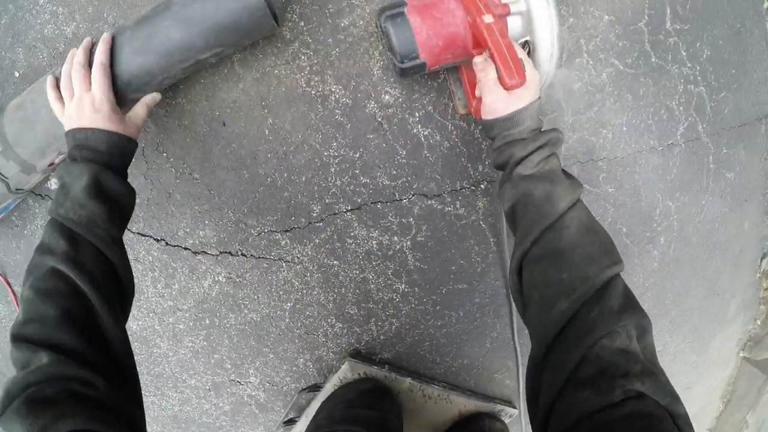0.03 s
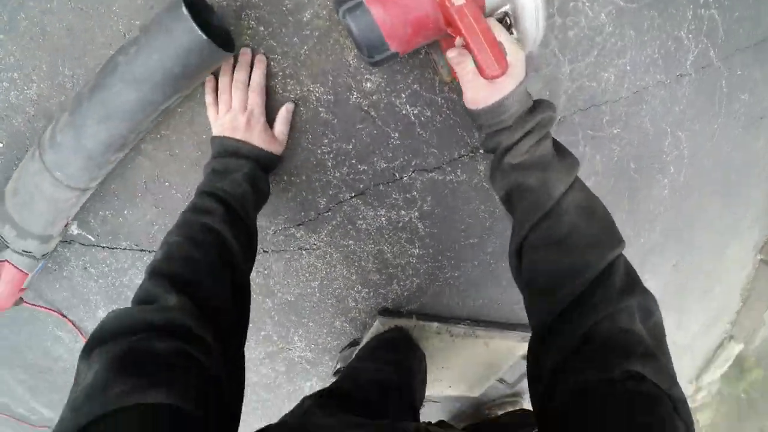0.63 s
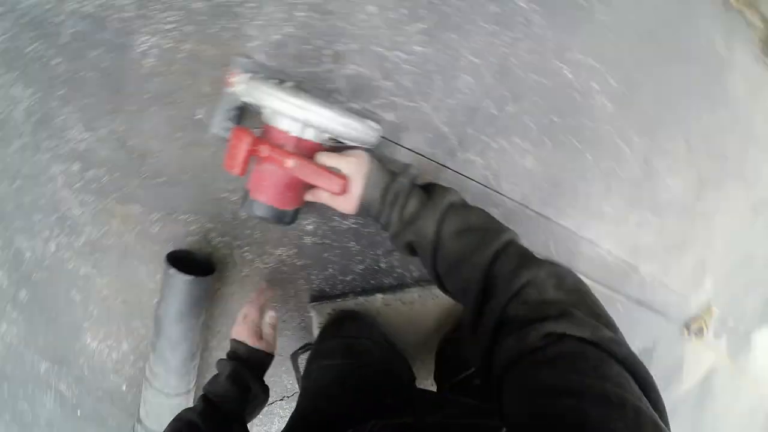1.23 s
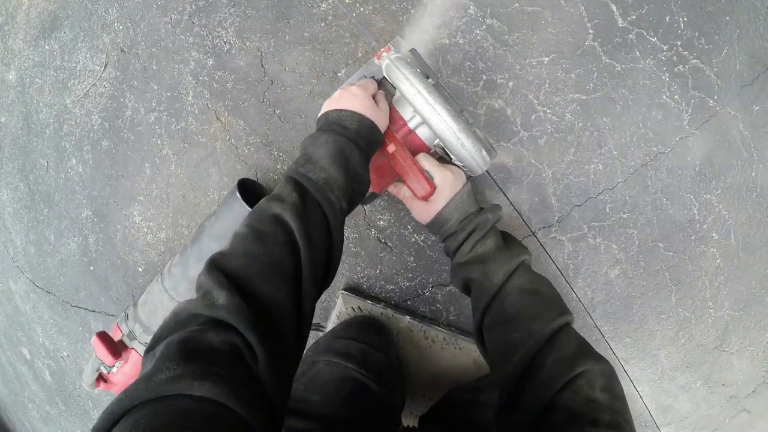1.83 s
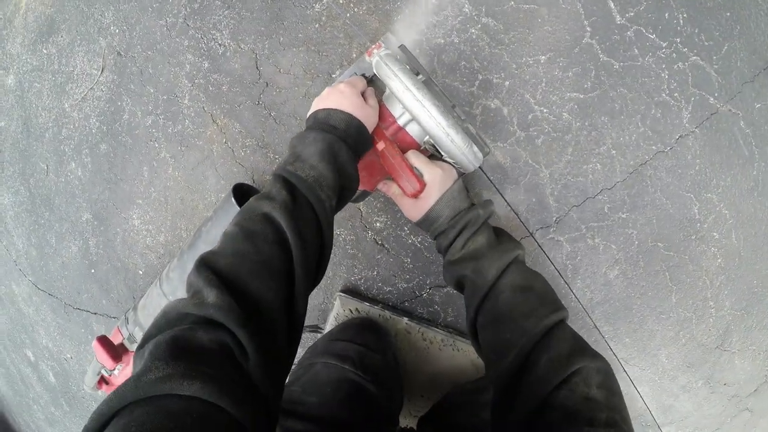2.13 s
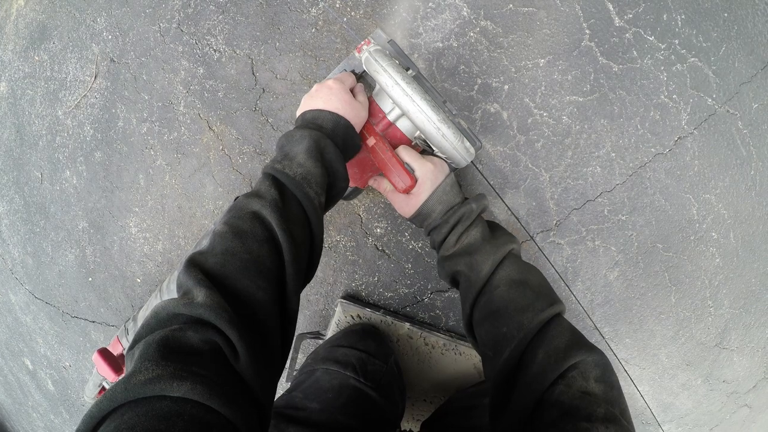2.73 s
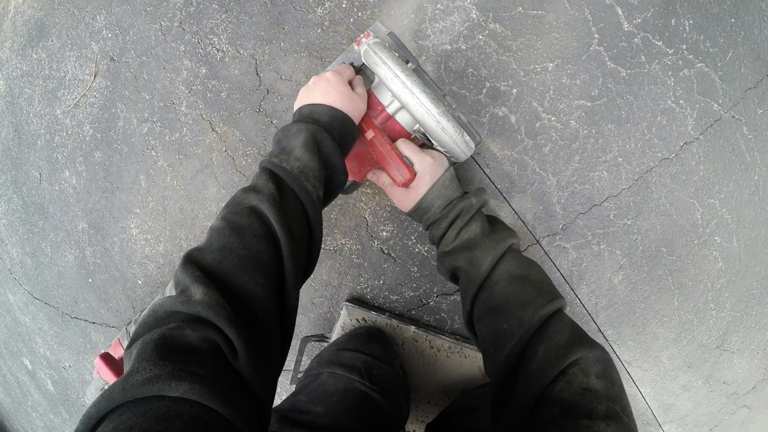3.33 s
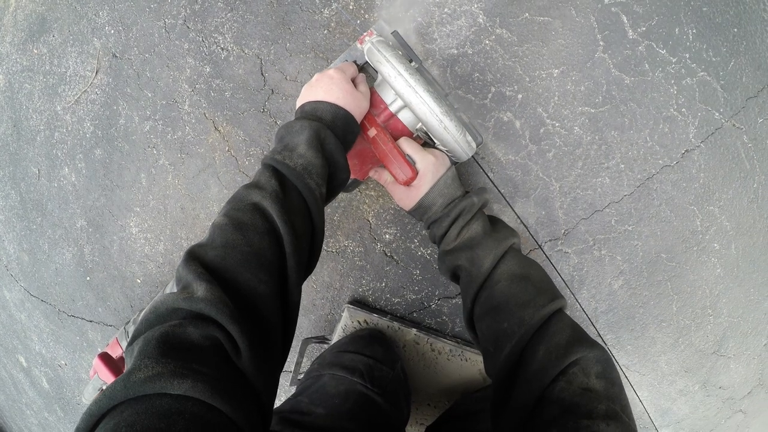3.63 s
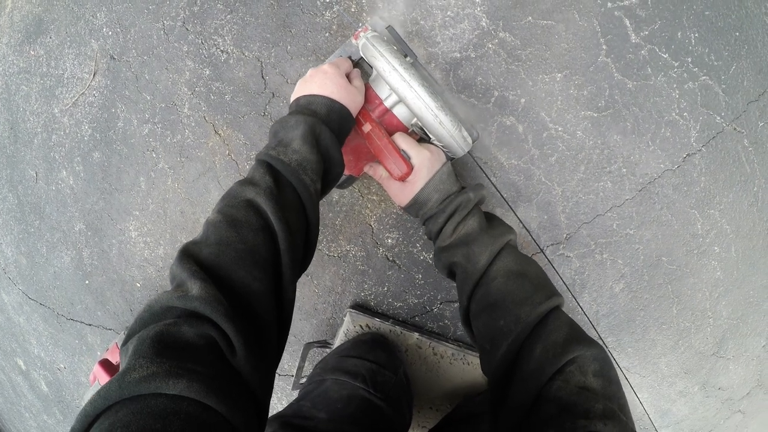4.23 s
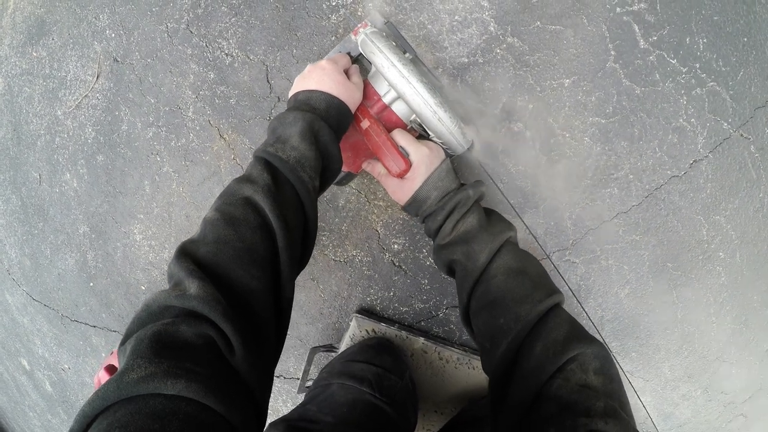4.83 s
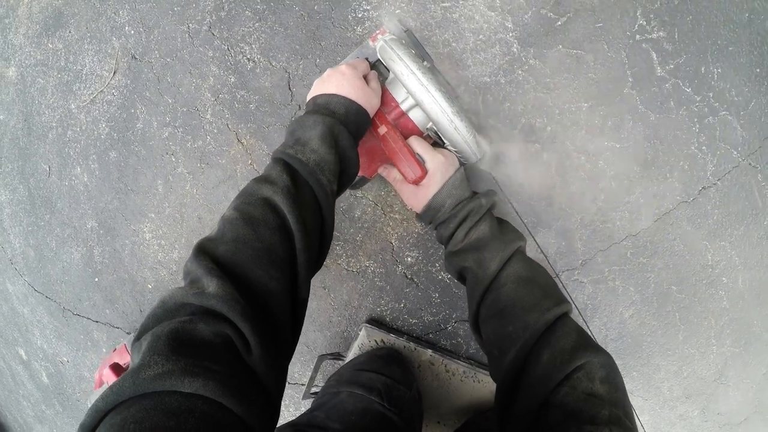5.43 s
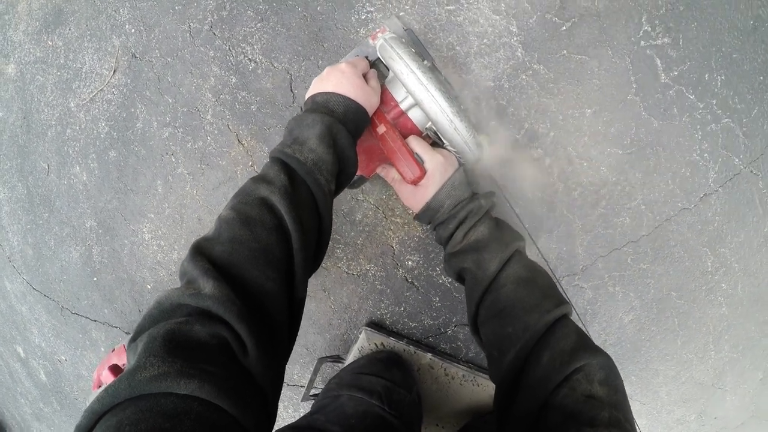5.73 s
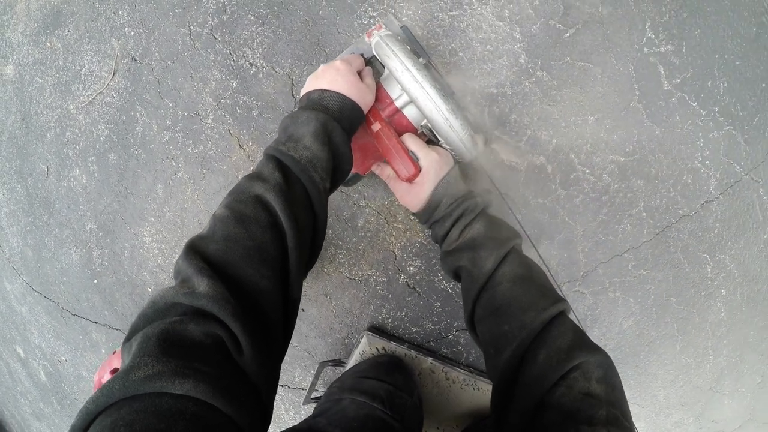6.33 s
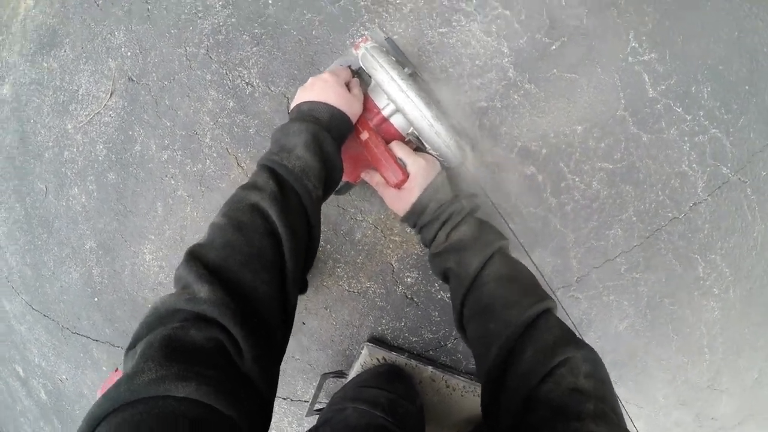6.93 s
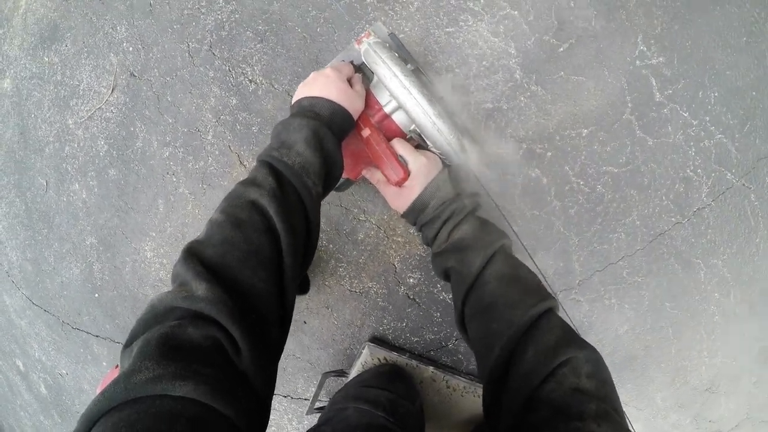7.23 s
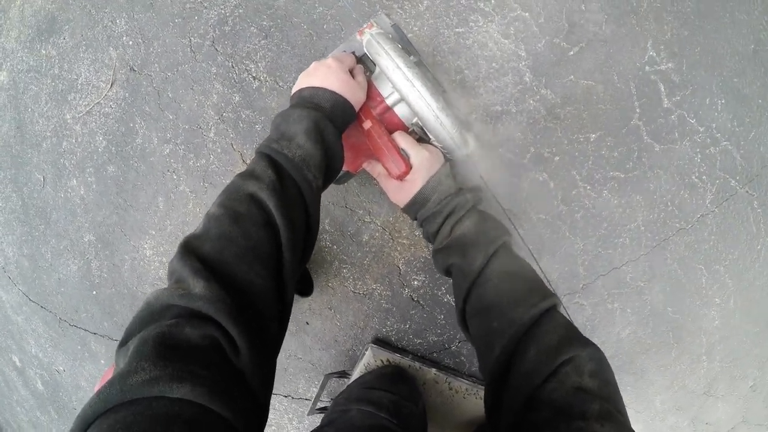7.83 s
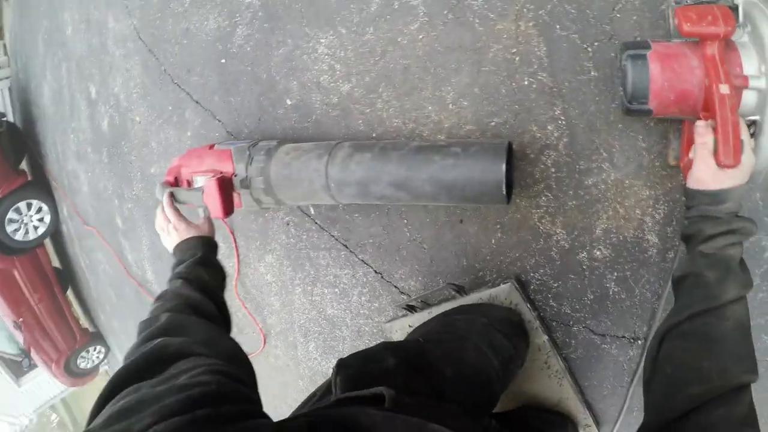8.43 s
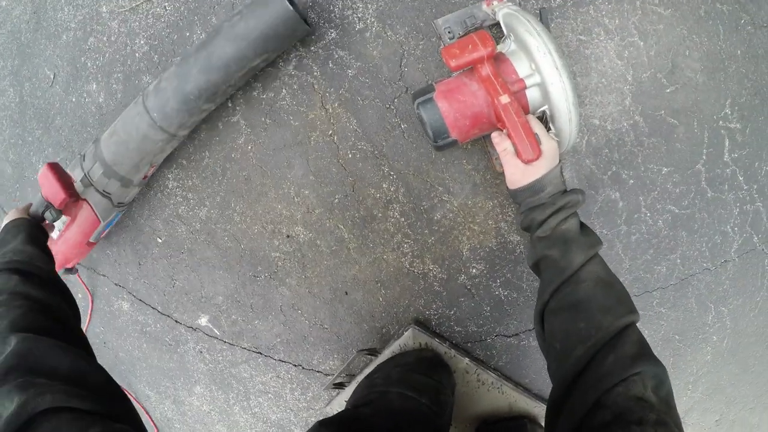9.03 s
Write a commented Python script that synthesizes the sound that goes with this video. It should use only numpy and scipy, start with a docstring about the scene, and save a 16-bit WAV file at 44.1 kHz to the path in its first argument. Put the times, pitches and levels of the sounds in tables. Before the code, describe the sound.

A circular saw grinds through asphalt with a harsh, hissing whine while a leaf blower roars and drones beside it outdoors.

```python
"""A circular saw nicks an asphalt driveway and lifts clear, while an electric leaf blower roars beside it.
At 1.6 s the blade is set down and bogs to about half speed: grit rings the steel, the loaded gears whine.
Near 5.4 s a gust buffets the body-worn microphones, and their stereo pair fades to one sheltered mic
as the level dips briefly. At 8 s the blade is pulled out of the slot and spins up again."""
import sys
import numpy as np
from scipy import signal
from scipy.fft import rfft, irfft, next_fast_len
from scipy.io import wavfile
from scipy.ndimage import uniform_filter1d

SR = 44100
rng = np.random.default_rng(int(sys.argv[2]) if len(sys.argv) > 2 else 0)


def write(x):
    x = np.atleast_2d(x).T
    wavfile.write(sys.argv[1], SR, np.round(np.clip(x, -1, 1) * 32767).astype(np.int16))


N = 399987
TIME = np.arange(N) / SR
BINS = np.fft.rfftfreq(N, 1 / SR)

# Pushes on the saw, each held until the next.
# Each row: start in seconds, load as the share of free speed it takes away (0 is lifted).
PUSHES = [(0, .19), (.2, .65), (.35, 0), (1.63, .8), (1.88, .49), (2.15, .65), (2.42, .51), (2.9, .445),
          (5.7, .47), (6.3, .34), (6.9, .45), (7.4, .393), (7.98, 0)]
# Colour of the grinding. Each row: frequency in Hz, relative level in dB.
GRIND_COLOUR = [(200, -74.5), (700, -60.5), (1500, -68.5), (2100, -66), (3400, -68), (5000, -60.5),
                (7000, -64.5), (10000, -67.3), (12000, -59.5), (14000, -55), (15700, -57.3)]
# Ring of the steel blade. Each row: frequency in Hz, width in Hz, boost in dB.
BLADE_MODES = [(2570, 390, 6.5), (2880, 110, 5), (3370, 120, 7), (4030, 200, 3.5), (5000, 350, 3),
               (5760, 180, -2), (7400, 167.0, 3), (7924, 373.0, 10), (8720, 280, 4), (9540, 232.0, 4.8),
               (10660, 210.0, 7), (11170, 210, 6.5), (12381.0, 197.0, 2.5), (13900, 217.0, 5.5),
               (14614.0, 204.0, 3), (15239.0, 221.0, 3)]
# Colour of the saw's air. Each row: frequency in Hz, relative level in dB.
RUSH_COLOUR = [(500.0, -76), (1500.0, -62), (2500.0, -67), (4500.0, -63.5), (6500.0, -62.5), (8500.0, -63),
               (10500.0, -66), (12500.0, -63.5), (14000.0, -63), (15500.0, -56.1)]
# Ring of the guard and housing. Each row: frequency in Hz, width in Hz, boost in dB.
GUARD_MODES = [(1500.0, 176.0, 1), (2724, 380, 7.5), (3340, 410, 5.5), (3870, 320, 4), (6361.0, 415.0, 0.5),
               (7000, 462.0, 1), (8749.0, 544.0, -1), (9300, 493.0, 4.5), (9701.0, 577.0, -0.3),
               (12600, 979.0, 6.5), (15104.0, 724.0, 2)]
# Blade or guard sings out. Each row: start and end in seconds, pitch and width in Hz, top level in dB.
SQUEALS = [(-.25, .35, 12520, 400, -25.5), (.25, .85, 14950, 250, -29), (1.052, 1.85, 7800, 603, -32),
           (2.3, 3.6, 13750, 400, -30), (-.2, .75, 6550, 500, -34), (2.65, 3.55, 5100, 130, -37),
           (3.45, 4.05, 5820, 350, -31), (4.449, 5.15, 11180, 90, -34), (4.3, 5.6, 14800, 199.8, -32),
           (5.799, 6.6, 4000, 230, -29.5), (6.65, 8.1, 7860, 120, -34), (6.6, 7.6, 11250, 250, -35),
           (7.199, 8.0, 2607, 70, -35.5), (8.05, 8.42, 10590, 160, -31), (8.149, 8.85, 3850, 420, -31),
           (8.25, 8.7, 12660, 500, -28), (8.599, 9.25, 9700, 130, -36), (5.2, 5.9, 9050, 300, -35)]
# The loaded gears sing. Each row: start and end in seconds, relative level in dB, jitter in radians.
GEAR_WHINES = [(1.52, 2.05, -31.5, 2.4), (1.98, 2.36, -29.5, 1.4), (2.62, 3.44, -32, .55),
               (6.96, 8.06, -28.5, .4), (7.98, 8.36, -34, 2.2)]
# The blower, shielded by arm and body during the cut.
# Each row: time in seconds, relative roar level in dB, impeller tone level in dB.
BLOWER_LEVELS = [(0, -2, -30.5), (.9, 2.5, -32), (1.6, 0.5, -28.5), (1.8, -6.5, -39), (3.9, -3.5, -40.5),
                 (4.8, -5.5, -38), (5.2, -4.5, -33), (5.65, -7.5, -37), (6.0, -5.5, -30.5),
                 (7.95, -6.5, -32), (8.6, 0, -25.5), (8.9, 1.8, -28), (9.07, -2.5, -32)]
# Colour of the blower's air. Each row: frequency in Hz, relative level in dB.
ROAR_COLOUR = [(30, -61), (80, -57), (150, -53.5), (310, -51.5), (430, -53), (550, -57.5), (680, -51.5),
               (1050, -53), (1400, -55.5), (2000, -81), (6000, -90)]
# The draught over the microphones. Each row: time in seconds, level in dB.
DRAUGHT_LEVELS = [(0, -49), (1.6, -42), (2.4, -52), (3.7, -43), (4.6, -47), (6.1, -40), (6.8, -38.5),
                  (7.9, -42), (8.7, -33.5)]
# Single thumps of wind. Each row: centre in seconds, peak level in dB, pitch in Hz.
BUFFETS = [(5.362, -13, 170), (5.437, -20, 89.9), (5.491, -11, 85), (5.568, -17, 90), (5.623, -11, 74.8)]
# Stereo image of the noise layers. Each row: frequency in Hz, left-right likeness (1 is mono).
LIKENESS = [(60, 0.96), (300, 0.7), (700, 0.69), (1300, .88), (2200, 0.63), (3200, .7), (4300, 0.45),
            (5600, 0.74), (6500, 0.99), (9700, 1), (11000, 0.89), (12500, 0.74), (15500, 0.47)]
# Phase across the stereo pair. Each row: frequency in Hz, lead of the left side in radians.
PAIR_PHASE = [(30, 0.5), (340, 0.1), (520, 0.6), (700, 1.63), (900, 2.5), (1400, 3), (1800, 1.66),
              (2200, 0.65), (3500, 0.25), (4200, -1), (5500, 0.5), (12000, 0.76), (16000, 0)]
# Lean of the stereo pair. Each row: frequency in Hz, left minus right in dB.
PAIR_BALANCE = [(60, 1), (110, -1), (200, -5), (380, -7), (700, -7), (1290, -5.5), (2380, 1), (4400, 2.5),
                (8000, -1), (16000, 0.5)]
# Colour of the sheltered microphone. Each row: frequency in Hz, gain in dB.
SHELTERED_COLOUR = [(100, 0.7), (250, 2), (500, 2), (780, 0.5), (920, -5), (1090, -14.5), (1270, -10.5),
                    (1600, 1.5), (2300, 6), (3500, 5), (4900, -3.5), (6300, 3.5), (9500, 6.5), (11200, 3.5),
                    (13000, -10), (14800, -20.5)]

FREE_HZ, START_HZ, INERTIA_S = 161, 130, .63  # blade speed unloaded and at first; lag of the motor
GEAR_TEETH, PINION_TEETH, FAN_VANES = 49, 9, 12
BLOWER_HZ, BLOWER_VANES, HUM_HZ = 467.6, 6, 240


def saw():
    """Each push drags the motor down; all the saw's layers ride on the one turning blade."""
    load = np.zeros(N)
    for start, share in PUSHES:
        load[TIME >= start] = share
    speed = lagged(FREE_HZ * (1 - load), INERTIA_S, START_HZ)
    angle = turns(speed * (1 + .0012 * wander(11.99)))
    return saw_air(angle, speed) + grinding(angle, load) + squeals(angle) + saw_tones(angle, speed, load)


def grinding(angle, load, full_bite_load=.3, idle_db=-8.3, cut_db=-.4):
    """Grit strikes the rim, hardest once a turn as the blade wobbles, and rings the steel."""
    pressed = np.minimum(load / full_bite_load, 1)
    sunk = np.maximum(lagged(pressed, lag_s=.12), lagged(pressed, lag_s=.36))  # sinks fast, clears slowly
    grind_db = idle_db + (cut_db - idle_db) * sunk
    wobble = .19 * (1 + .38 * wander(15)) * np.cos(angle)
    bite = np.maximum(1 + wobble + .043 * np.cos(3 * angle), 0)
    chips = rng.standard_normal((2, N)) * (rng.random(N) < 2500 / SR)  # about 2500 ticks a second
    hiss = rng.standard_normal((2, N))
    scrape = np.array([rim_scrape(angle), rim_scrape(angle)])
    grit = evened(hiss + amp(-7.5) * evened(chips) + amp(-3.5) * scrape)
    stones = amp(.28 * wander(70) + .6 * wander(8.7))  # hard and soft spots in the asphalt
    # The contact point favours one mode, then another.
    drive = patchy(grit * bite * stones, depth_db=2.5, bins=5, frames=18)
    return spread(drive, read(GRIND_COLOUR) + bumps(BLADE_MODES)) * amp(grind_db)


def rim_scrape(angle):
    """The uneven rim scrapes alike on every turn: a buzz whose pattern slowly shifts."""
    place = angle / (2 * np.pi) % 1
    profiles = signal.resample(rng.standard_normal((4, 360)), 2880, axis=1)
    around = np.arange(profiles.shape[1]) / profiles.shape[1]
    weights = np.array([wander(1.48) for _ in profiles])
    scrapes = np.array([np.interp(place, around, profile) for profile in profiles])
    return evened((weights * scrapes).sum(0) / np.linalg.norm(weights, axis=0))


def saw_air(angle, speed):
    """Cooling air and blade windage rush through the guard, louder with speed."""
    rush_db = by_speed(speed, free_db=1.6, doubling_db=11)
    air = patchy(rng.standard_normal((2, N)), depth_db=2.1, bins=7, frames=12)
    rush = spread(air * (1 + .094 * np.cos(angle)), read(RUSH_COLOUR) + bumps(GUARD_MODES))
    return rush * amp(rush_db + .56 * wander(8.4))


def saw_tones(angle, speed, load):
    """Gear mesh, rough with backlash, whines with the fan and armature over the blade's thrum."""
    mesh_db = by_speed(speed, free_db=-39, doubling_db=9)
    backlash_rad = 1.8
    for start, end, db, jitter_rad in GEAR_WHINES:
        singing = spell(start, end, edge_s=.11)
        mesh_db += singing * (db - mesh_db)
        backlash_rad += singing * (jitter_rad - backlash_rad)
    teeth = np.sin(GEAR_TEETH * angle + backlash_rad * wander(55))
    mesh = amp(mesh_db - 1.5 + 1.6 * wander(40)) * teeth * (1 + .22 * np.cos(angle))
    armature = angle * GEAR_TEETH / PINION_TEETH
    fan_db = by_speed(speed, free_db=-36.5, doubling_db=14)
    fan = amp(fan_db + 2.5 * wander(40)) * np.sin(FAN_VANES * armature + .8 * wander(50))
    overtones = amp(mesh_db - 16) * sum(np.sin(k * armature + 1.2 * wander(50)) for k in (11, 14, 17))
    strain_db = 12.5 * lagged(load, lag_s=.015, start=load[0])
    thrum_db = by_speed(speed, free_db=-40, doubling_db=13.5) + strain_db
    thrum = amp(thrum_db + 1.7 * wander(6)) * (np.sin(angle) + amp(-4) * np.sin(2 * angle))
    return np.sqrt(2) * (mesh + fan + overtones + thrum)


def squeals(angle):
    """Single resonances swell for a moment, throbbing with each turn of the blade."""
    out = np.zeros(N)
    for start, end, hz, width, db in SQUEALS:
        now = (TIME > start) & (TIME < end)
        t = TIME[now]
        lowpass = signal.butter(2, width / 2, fs=SR)
        drift = signal.lfilter(*lowpass, rng.standard_normal((2, len(t))))
        ring = drift[0] * np.cos(2 * np.pi * hz * t) + drift[1] * np.sin(2 * np.pi * hz * t)
        throb = 1 + .23 * np.cos(angle[now])
        swell = np.sin(np.pi * (t - start) / (end - start))
        out[now] += amp(db) * evened(ring * throb) * swell
    return out


def blower_air():
    """Turbulent air roars from the blower's tube."""
    roar_db = curves(BLOWER_LEVELS)[0]
    return spread(rng.standard_normal((2, N)), read(ROAR_COLOUR)) * amp(roar_db + .5 * wander(8.9))


def blower_tones():
    """The unbalanced impeller drones, its passing vanes whistle and the motor hums with the mains."""
    roar_db, impeller_db = curves(BLOWER_LEVELS)
    angle = turns(BLOWER_HZ * (1 + .001097 * wander(14.5) + .00079 * wander(1.41)))
    drone = amp(impeller_db + .94 * wander(12)) * (np.sin(angle) + amp(-18) * np.sin(2 * angle))
    vanes = BLOWER_VANES * angle
    whistle_db = -19.5 + .54 * impeller_db + 2.2 * wander(26)
    whistle = amp(whistle_db) * (np.sin(vanes) + amp(-16) * np.sin(2 * vanes))
    mains = 2 * np.pi * HUM_HZ * TIME + .14 * wander(8.8)
    hum_db = -29.5 + .8 * roar_db + 1.2 * wander(9.1)
    hum = amp(hum_db) * sum(amp(db) * np.sin(k * mains) for k, db in enumerate([0, -9, -12], 1))
    return np.sqrt(2) * (drone + whistle + hum)


def wind():
    """A draught rumbles on the microphones; one short gust flutters, with a few single thumps."""
    rumble_colour = read([(12, -17), (30, -3), (55, -1), (90, -7.5), (200, -21), (600, -52)])
    flutter_colour = read([(15, -14), (60, 1), (260, -1), (350, -22), (900, -50)])
    rumble = evened(filtered(rng.standard_normal(N), amp(rumble_colour)))
    flutter = evened(filtered(rng.standard_normal(N), amp(flutter_colour)))
    out = rumble * amp(curves(DRAUGHT_LEVELS)[0] + 1.5 * wander(6))
    out += flutter * amp(-20.5) * spell(5.335, 5.585, edge_s=.07)
    for centre, db, hz in BUFFETS:
        phase = 2 * np.pi * hz * (TIME - centre)
        out += amp(db) * phase * np.exp((1 - phase ** 2) / 2)  # one pull and push of pressure
    return out


def dipped(x, bass_hz=303):
    """The level dips briefly after the gust, and the bass a little longer."""
    bass = filtered(x, 1 / (1 + (BINS / bass_hz) ** 6))
    thin = x - bass * (1 - amp(-6 * spell(5.65, 6.38, edge_s=.06)))
    return thin * amp(-2.5 * spell(5.5, 5.92, edge_s=.18))


def amp(db):
    """Decibels to gain."""
    return 10 ** (np.asarray(db) / 20)


def evened(x):
    """Scales to rms 1."""
    return x / np.sqrt(np.mean(x ** 2) + 1e-20)


def curves(rows):
    """Each column of a time table as an automation curve."""
    seconds, *columns = np.transpose(rows)
    return [np.interp(TIME, seconds, column) for column in columns]


def read(points):
    """A curve on BINS through (Hz, value) points, joined on a log-frequency axis."""
    hz, value = np.transpose(points)
    return np.interp(np.log(BINS + 1), np.log(hz + 1), value)


def bumps(modes):
    """The dB that a set of resonances adds to a spectrum."""
    return sum(db / (1 + (2 * (BINS - hz) / width) ** 2) for hz, width, db in modes)


def filtered(x, gain):
    """Equalises with a gain given on BINS."""
    size = next_fast_len(N, True)
    hz = np.fft.rfftfreq(size, 1 / SR)
    return irfft(rfft(x, size) * np.interp(hz, BINS, gain), size)[..., :N]


def wander(rate_hz):
    """Smooth random drift of rms 1, up to about the given rate."""
    knots = rng.standard_normal(N // 20)
    hz = np.fft.rfftfreq(len(knots), 20 / SR)
    smooth = irfft(rfft(knots) / np.sqrt(1 + (hz / rate_hz) ** 4), len(knots))
    return evened(np.interp(TIME, np.arange(len(knots)) * 20 / SR, smooth))


def patchy(x, depth_db, bins, frames):
    """Lets narrow patches of the spectrum swell and fade by chance."""
    spectra = signal.stft(x, nperseg=2048)[2]
    chance = rng.standard_normal(spectra.shape[1:])
    patches = uniform_filter1d(uniform_filter1d(chance, bins, 0), frames, 1)
    gain = evened(amp(depth_db * evened(patches)))
    return signal.istft(spectra * gain, nperseg=2048)[1][:, :N]


def spread(pair, spectrum_db):
    """Colours two unrelated noises and mixes them into partly alike left and right."""
    same = np.clip(read(LIKENESS), 0, 1)
    gain = amp(spectrum_db) * np.sqrt(SR / 2)
    mid = filtered(pair[0], gain * np.sqrt((1 + same) / 2))
    side = filtered(pair[1], gain * np.sqrt((1 - same) / 2))
    return np.array([mid + side, mid - side])


def turns(hz):
    """Angle of a shaft that follows a speed curve."""
    return 2 * np.pi * np.cumsum(hz) / SR


def lagged(x, lag_s, start=0):
    """Follows x with a lag, from a starting value."""
    keep = np.exp(-1 / (lag_s * SR))
    return start + signal.lfilter([1 - keep], [1, -keep], x - start)


def spell(start, end, edge_s):
    """Fades from 0 to 1, holds, and fades out; times in seconds."""
    return np.clip(np.minimum(TIME - start, end - TIME) / edge_s, 0, 1)


def by_speed(speed, free_db, doubling_db):
    """Level in dB of a part that grows louder with each doubling of blade speed."""
    return free_db + doubling_db * np.log2(speed / FREE_HZ)


def scene():
    """Both machines at arm's length, and the wind."""
    return saw() + blower_air() + blower_tones() + wind()


def record(dry, fade_start_s=5.52, fade_lag_s=.1, cutoff_hz=15820):
    """The stereo pair fades to one sheltered microphone; the level dips and the very top is cut."""
    lean = amp(read(PAIR_BALANCE))
    turn = np.exp(.5j * read(PAIR_PHASE))
    right_gain = np.sqrt(2 / (1 + lean ** 2))
    pair = np.array([filtered(dry[0], right_gain * lean * turn), filtered(dry[1], right_gain / turn)])
    sheltered = filtered(dry[1], amp(read(SHELTERED_COLOUR)))
    fade = 1 - np.exp(-np.maximum(TIME - fade_start_s, 0) / fade_lag_s)
    mix = dipped((1 - fade) * pair + fade * sheltered)
    lowpass = signal.firwin(1023, cutoff_hz, window=("kaiser", 8), fs=SR)
    return signal.oaconvolve(mix, lowpass[None], "same")


dry = scene()
out = record(dry)
write(out)
```